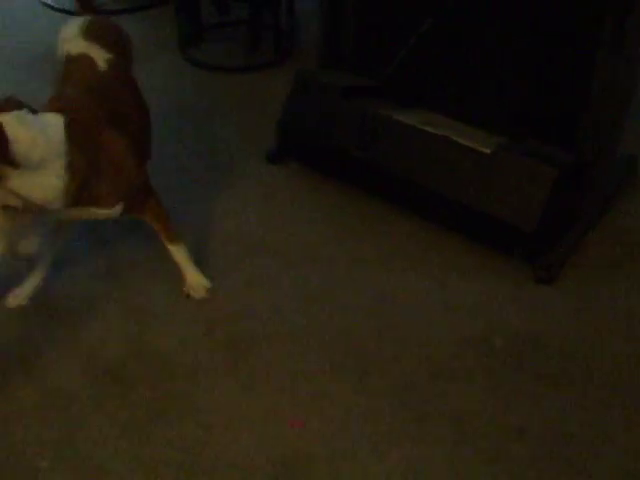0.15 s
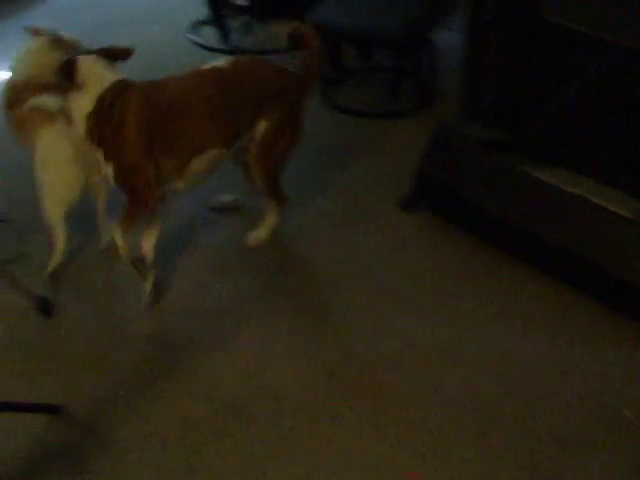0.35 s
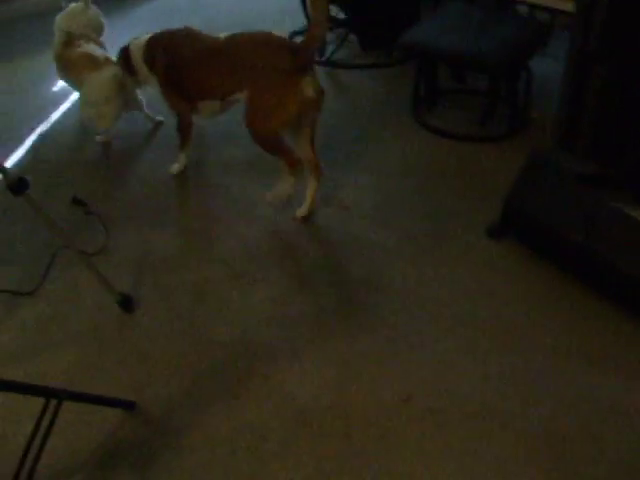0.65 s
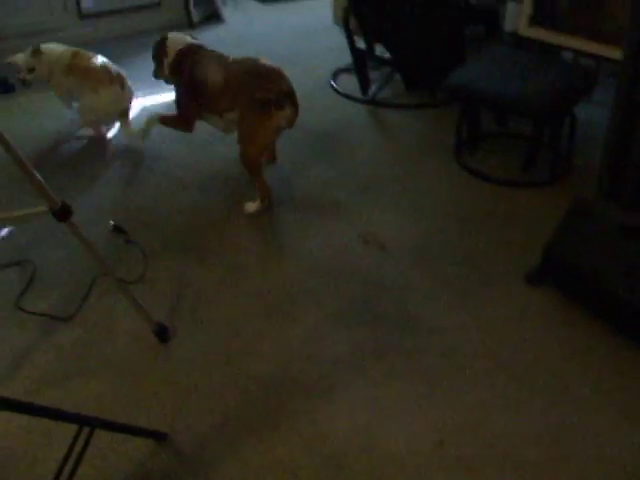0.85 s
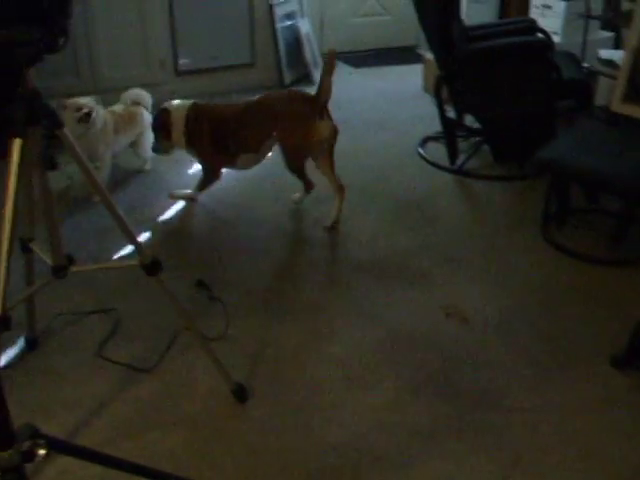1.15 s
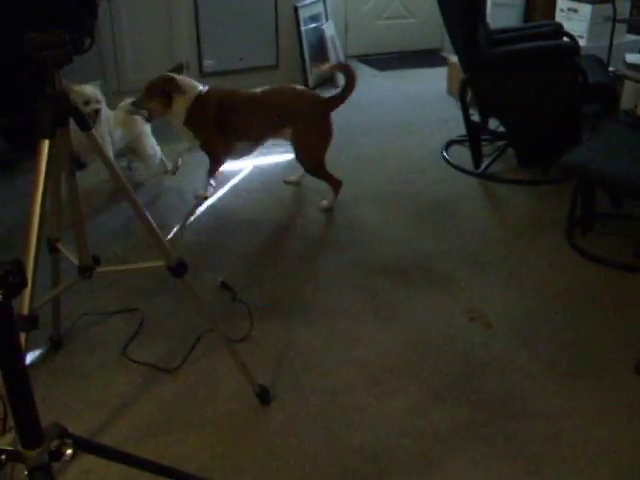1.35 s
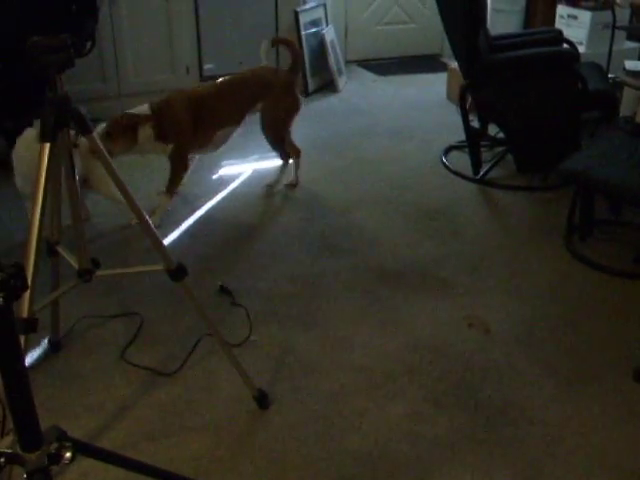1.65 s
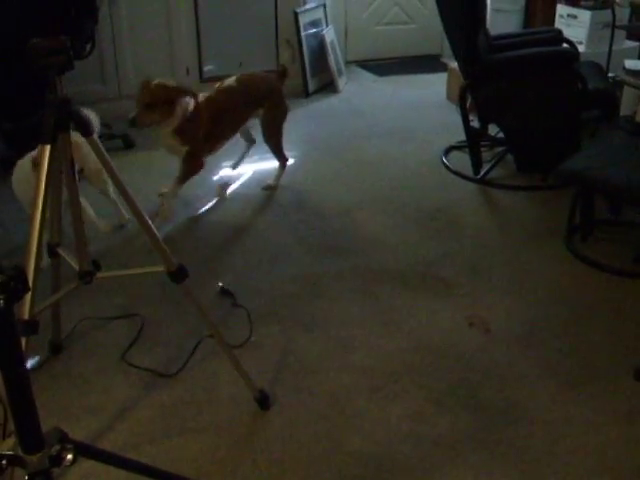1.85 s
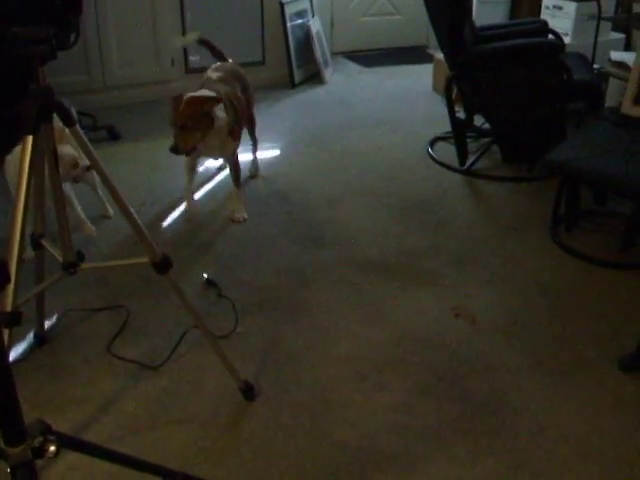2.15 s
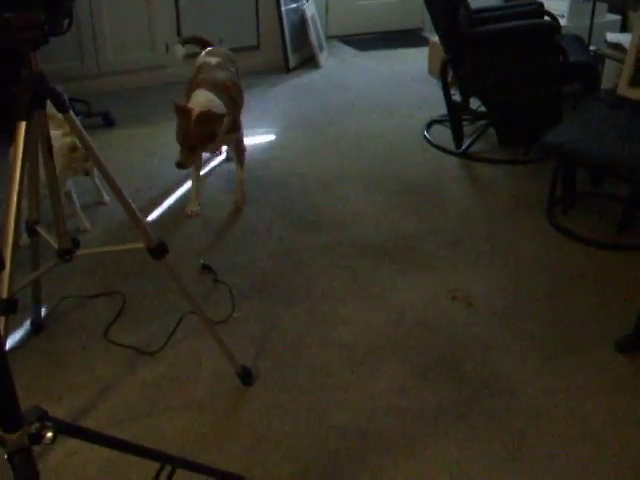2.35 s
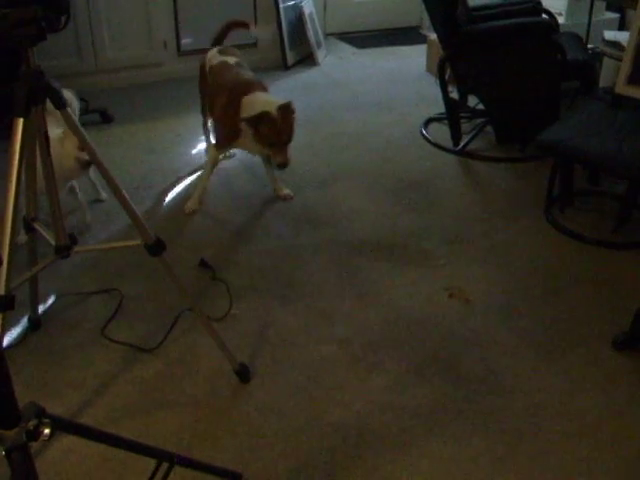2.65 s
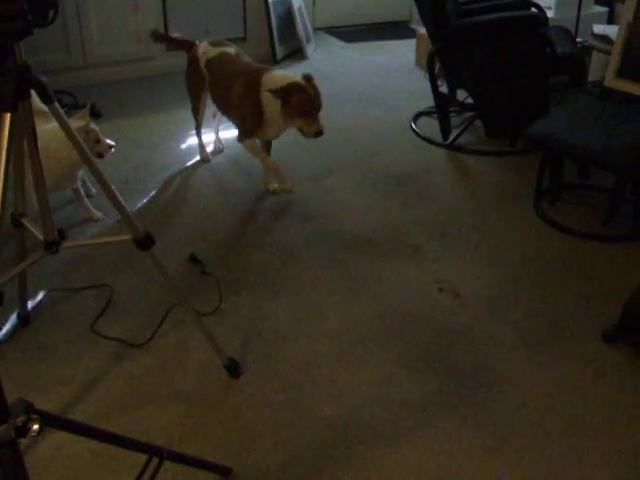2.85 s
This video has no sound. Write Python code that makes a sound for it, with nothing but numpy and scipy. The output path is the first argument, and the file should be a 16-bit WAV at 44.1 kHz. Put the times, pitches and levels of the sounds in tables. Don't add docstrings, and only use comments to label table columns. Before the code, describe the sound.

Playful dog growls and hoarse breaths over muffled paw thumps on carpet, a snort near one second, a sharp tooth snap later, a final short bark, all over faint camera hiss, hum and thin whine.

```python
import sys
import numpy as np
from scipy import signal
from scipy.fft import rfft, irfft
from scipy.io import wavfile
from scipy.ndimage import uniform_filter1d

SR = 44100
rng = np.random.default_rng(int(sys.argv[2]) if len(sys.argv) > 2 else 0)


def put_to_file(sound):
    columns = np.atleast_2d(sound).T
    safe = np.clip(columns, -1, 1)
    whole_steps = np.round(safe * 32767)
    wavfile.write(sys.argv[1], SR, whole_steps.astype(np.int16))


def boost_factor(decibels):
    exponent = np.asarray(decibels, float) / 20
    return 10 ** exponent


N = 132300
T = np.arange(N) / SR
LEAD_S = 0.15

# frequency_hz, density_db
HISS_SPECTRUM = [(15, -34), (25, -8.5), (49, -22), (106, -19.5), (453, -20), (511, -19.5), (635, -22),
                 (4700, -26), (8000, -25), (10400, -20.5), (17600, -120)]
# pitch_hz, level_db
HUM_TONES = [(60, -62.5), (294, -68)]
# start_s, level_db, floor_note_hz
PAW_LANDINGS = [(.0, -48, 226), (0.07, -39.5, 200), (0.157, -32, 232), (0.212, -34, 222), (0.299, -40, 196),
                (0.353, -47, 192), (0.479, -26.5, 275), (0.496, -34, 334), (0.514, -34, 311),
                (.535, -43, 390), (0.589, -35, 260), (.63, -38.5, 202), (0.698, -45, 201),
                (0.757, -27.5, 284), (0.899, -53, 241), (1.003, -30.5, 293), (1.101, -37.5, 270),
                (1.167, -41, 344), (1.19, -41.5, 324), (1.299, -31.5, 298), (1.32, -52, 372),
                (1.34, -44, 250), (1.501, -43.5, 340), (1.567, -34.5, 297), (1.616, -30.5, 230),
                (1.659, -32, 205), (1.832, -66, 303), (2.039, -46, 286)]
# pitch_hz, level_db, t60_s
BOARD_MODES = [(200, -7.5, 0.16), (409.3, -22.5, 0.45), (440, -3, 0.02), (790, -12, 0.047)]
# full_strength_s, swell_time_constant_s, hold_s, level_db, mouth_resonance_hz
HUFF_BURSTS = [(0.059, 0.025, 0.0067, -56.5, 1650), (.143, 0.0067, 0.066, -41, 1510),
               (0.201, 0.004, 0.014, -38, 1500), (0.234, 0.031, 0.011, -42, 1220),
               (0.587, 0.03, 0.032, -41.5, 1400), (0.766, 0.014, 0.02, -50, 1090),
               (0.952, 0.024, 0.064, -30, 1240), (1.175, 0.0017, 0.047, -48.5, 1210),
               (1.551, 0.01, 0.073, -47.5, 1540), (1.62, 0.0065, 0.05, -28.5, 1450),
               (1.682, .001, 0.033, -33.5, 1540), (1.721, .003, 0.021, -43.5, 1530),
               (2.042, 0.0026, 0.019, -53, 850), (2.224, 0.002, 0.011, -48, 1000),
               (2.678, 0.0065, 0.048, -21, 1380)]
# mouth_resonance_db, open_mouth_hiss_db, teeth_hiss_db, chest_rumble_db, fade_s
HUFF_COLOURS = [(3, -2, 0, 5, 0.01), (-10, -8.5, -21, -9, 0.0088), (-4.5, -6, -7, -10.5, 0.067),
                (1, -4.5, 5, -32, 0.024), (-2, 1, -7.5, -7.5, 0.021), (-5.5, -8, -7, 1.5, 0.066),
                (-8, -4.5, -0.5, -13.5, 0.027), (-7.5, -6.5, -7, -6, 0.041), (-0.5, -6.5, -3, -2.5, 0.016),
                (-7.5, -3, -9, -19, 0.04), (-6.5, -5.5, -24, -9, 0.0037), (-1, 0, -2.5, -13, 0.0081),
                (-6, -4, -12, -2, 0.006), (-10, -19, -25, -8.5, 0.018), (-5, -10, -7, -16, 0.023)]
# multiple_of_main_resonance [ratio], relative_width [ratio], level_db
MOUTH_MODES = [(1, 0.26, 6.5), (1.4, 0.19, -7.5), (2.05, 0.38, -1), (2.5, 0.44, -8.5)]
# full_strength_s, swell_time_constant_s, hold_s, level_db, throat_hz
GROWL_BREATHS = [
    (0.089, 0.031, 0.076, -53.5, 805),
    (0.256, 0.014, 0.0069, -40, 867),
    (0.664, 0.012, 0.0099, -49.5, 870),
    (0.929, 0.074, 0.071, -37.5, 650),
    (1.783, 0.03, 0.036, -38.5, 770),
]
WHISTLE_STARTS = [.065, .145, .558, .93, .95, .96, 1.543, 1.6, 1.61, 1.63, 1.683, 1.715, 1.8, 1.82, 2.49,
                  2.495, 2.582, 2.595, 2.635, 2.648, 2.663, 2.675, 2.685, .578, .59, .465, 2.77, .87]
# length_s, level_db, pitch_hz, breadth_hz
WHISTLE_TONES = [(.08, -49.5, 830, 100), (0.022, -42, 2100, 230), (0.029, -33, 1662, 32),
                 (0.068, -38, 1540, 163), (0.066, -38, 2890, 250), (0.055, -45, 940, 80),
                 (0.0091, -47, 4700, 600), (0.022, -49, 990, 170), (0.031, -32.5, 5380, 770),
                 (0.037, -38, 6000, 200), (0.035, -60, 600, 120), (0.036, -51, 1570, 100),
                 (.16, -44, 8600, 9700), (0.065, -46.5, 630, 130), (0.13, -56, 1960, 210),
                 (0.11, -56.5, 1120, 90), (0.092, -52.5, 1060, 130), (0.042, -64, 3400, 100),
                 (0.021, -47, 1380, 220), (0.096, -33.5, 6200, 3000), (0.046, -35.5, 3530, 220),
                 (0.067, -28.5, 1195, 290), (0.045, -31.5, 5650, 600), (0.053, -47, 3770, 370),
                 (0.067, -57, 5700, 680), (.09, -58, 2350, 150), (0.12, -55, 1800, 170),
                 (0.1, -44.5, 490, 360)]
# start_s, level_db, pitch_hz
JOIST_THUMPS = [
    (.1, -48, 121),
    (0.272, -47, 112),
    (.76, -48.5, 62),
    (0.961, -38.5, 110),
    (.98, -50, 54.3),
    (1.63, -36, 117),
    (1.679, -38.5, 71),
    (1.82, -51, 62),
    (2.691, -40.5, 60.6),
    (2.709, -40, 129.7),
]
# start_s, length_s, peak_db, pitch_hz
BREATH_SURGES = [(.134, 0.0088, -38.5, 807), (.157, 0.03, -43.5, 1504), (0.194, 0.0092, -34, 1540),
                 (.208, 0.0058, -39, 1290), (0.214, 0.0063, -39, 1400), (0.233, .012, -39, 1480),
                 (0.259, 0.017, -40.5, 876), (0.586, 0.019, -37.5, 2956), (0.484, .05, -54, 1487),
                 (0.488, 0.016, -52, 786), (0.954, 0.01, -26, 1640), (.959, 0.015, -26.5, 1226),
                 (.96, 0.01, -32.5, 4400), (0.966, 0.005, -29, 1804), (0.978, 0.0053, -34, 2820),
                 (0.983, 0.011, -25, 1780), (.999, 0.0066, -25, 2740), (1.013, 0.025, -30.5, 1300),
                 (1.178, 0.0076, -43, 1180), (1.197, 0.014, -46, 808), (1.555, 0.017, -42, 1617),
                 (1.574, 0.0099, -40.5, 1504), (1.625, 0.0091, -30, 1440), (1.644, 0.01, -27, 1570),
                 (1.653, .011, -27, 3000), (1.683, 0.0066, -24.5, 1538), (1.694, 0.013, -31, 1454),
                 (1.68, 0.045, -32.5, 3050), (1.705, 0.006, -20, 1496), (1.723, 0.022, -32.5, 1576),
                 (2.582, 0.022, -46.5, 1075), (2.588, 0.056, -50, 2110), (2.677, 0.015, -26, 2030),
                 (2.683, .017, -19, 1366), (2.69, 0.004, -25, 4300), (2.703, 0.011, -16, 1387),
                 (2.7, .009, -23.5, 2670), (2.716, 0.019, -24, 1392), (2.719, 0.0041, -29, 2680),
                 (2.76, 0.012, -30.5, 1560)]
# start_s, level_db, ring_hz
TEETH_SNAPS = [
    (.15, -31, 2150),
    (1.002, -33, 1255),
    (1.178, -44, 887),
    (1.681, -17.5, 1518),
]
# pitch_hz, level_db, t60_s
SNORT_MODES = [(370, -2, .02), (620, 0, .022), (1270, -2, .025), (2780, -5, .02), (4600, -6, .015)]


def level(x, db):
    return x * boost_factor(db) / np.sqrt(np.mean(x ** 2))


def band(x, hz, width):
    return signal.lfilter(*signal.iirpeak(hz, hz / width, fs=SR), x)


def walk(rate, count):
    k = int(SR / rate)
    held = np.repeat(rng.standard_normal(count // k + 2), k)
    return 1.2 * uniform_filter1d(held, k)[:count]


def shape(swell, hold, fade, count):
    t = T[:count] - LEAD_S
    rise = np.minimum(t, 0) / max(swell, 3e-4)
    fall = np.maximum(t - hold, 0) / max(fade, 1e-3)
    return np.exp(rise - fall)


def ring(t, hz, t60):
    return np.sin(2 * np.pi * hz * t) * boost_factor(-60 * t / t60)


def add(out, s, x):
    i = int(s * SR)
    x = x[max(-i, 0):N - i]
    out[max(i, 0):max(i, 0) + len(x)] += x


def sine(hz, db):
    return boost_factor(db + 1) * np.sin(2 * np.pi * (hz * T + rng.random()))


def camera_hiss():
    f = np.maximum(np.arange(N // 2 + 1) * SR / N, 1)
    hz, db = np.array(HISS_SPECTRUM).T
    colour = boost_factor(np.interp(np.log(f), np.log(hz), db))
    return level(irfft(rfft(rng.standard_normal(N)) * colour, N), -51)


def mains_hum():
    return sum(sine(hz, db + 0.87 * walk(5.1, count=N)) for hz, db in HUM_TONES)


def camera_whine():
    whine_hz, fold_hz, frame_hz = 7867, 16000, 30
    whine_db, fold_db = -59, -4
    flip_sharp, flip_lag_s = 15, 0.0195
    flip = np.tanh(flip_sharp * np.sin(np.pi * frame_hz * (T - flip_lag_s)))
    return flip * (sine(whine_hz, whine_db) + sine(fold_hz - whine_hz, whine_db + fold_db))


def paws():
    note_t60_s, push_s, carpet_low_hz = 0.079, 0.0013, 175
    out, t = np.zeros(N), T[:SR // 3]
    chance = rng.standard_normal((len(PAW_LANDINGS), len(BOARD_MODES)))
    for (s, db, hz), luck in zip(PAW_LANDINGS, chance):
        thud = ring(t, hz, note_t60_s)
        for (f, g, t60), e in zip(BOARD_MODES, luck):
            thud = thud + boost_factor(g + 5.7 * e) * ring(t, f * (1 + 0.043 * e), t60)
        add(out, s, boost_factor(db) * thud * (1 - np.exp(-t / push_s)) ** 2)
    return signal.lfilter(*signal.butter(3, carpet_low_hz, "high", fs=SR), out)


def huffs():
    flutter_hz, flutter_db = 170, 3
    notch_hz, notch_width_hz, notch_depth = 3900, 900, 0.6
    out, n = np.zeros(N), SR // 2
    for burst, colour in zip(HUFF_BURSTS, HUFF_COLOURS):
        s, swell, hold, db, hz = burst
        ring_db, wide_db, teeth_db, chest_db, fade = colour
        flutter = boost_factor([flutter_db * walk(flutter_hz, count=n) for _ in range(3)])
        mouth_air, low_air, open_air = rng.standard_normal((3, n)) * flutter
        mouth = np.zeros(n)
        for k, (multiple, width, g) in enumerate(MOUTH_MODES):
            mouth += (-1) ** k * boost_factor(g) * band(mouth_air, hz * multiple, hz * multiple * width)
        wide = band(band(open_air, 2870, 1700), 2500, 3000)
        wide = wide + boost_factor(9) * band(band(open_air, 1780, 640), 2520, 1400)
        teeth = band(low_air, 3900, 2700) + boost_factor(-5) * band(low_air, 7800, 2400)
        teeth = band(teeth, 6020, 4400)
        chest = band(band(low_air, 301, 630), 348, 960)
        x = level(mouth, ring_db) + level(wide, wide_db) + level(teeth, teeth_db) + level(chest, chest_db)
        x = x - notch_depth * band(x, notch_hz, notch_width_hz)
        add(out, s - LEAD_S, boost_factor(db) * x * shape(swell, hold, fade, count=n))
    return out


def growls():
    pulse_hz, jitter, breath_db = 55, 0.2, 0
    fade_s, sag = 0.039, 0.975
    out, n = np.zeros(N), SR // 2
    for s, swell, hold, db, hz in GROWL_BREATHS:
        phase = np.cumsum(pulse_hz * (1 + jitter * walk(40, count=n))) / SR % 1
        air = rng.standard_normal(n) * (np.exp(-phase / 0.32) + boost_factor(breath_db))

        def throat(f):
            return band(band(air, f, 290), f, 660) + boost_factor(-6.5) * band(air, f * 2, 520)

        closing = np.clip((T[:n] - LEAD_S) / (hold + fade_s), 0, 1)
        x = (1 - closing) * throat(hz) + closing * throat(hz * sag)
        x = x + boost_factor(3.5) * band(air, 309, 150) + boost_factor(-7) * band(air, 584, 170)
        x = x + boost_factor(-22) * band(air, 3280, 590) + boost_factor(-14) * band(air, 3600, 4100)
        add(out, s - LEAD_S, level(x, db) * shape(swell, hold, fade_s, count=n))
    return out


def whistles():
    out, n = np.zeros(N), SR // 5
    for s, (length, db, hz, width) in zip(WHISTLE_STARTS, WHISTLE_TONES):
        noise = band(band(rng.standard_normal(2 * n), hz, width), hz, 2 * width)[n:]
        power = uniform_filter1d(noise ** 2, size=400) + 0.19 * np.mean(noise ** 2)
        arch = np.sin(np.pi * np.clip(T[:n] / length, 0, 1)) ** 0.6
        add(out, s, boost_factor(db) * noise / np.sqrt(power) * arch)
    return out


def thumps():
    t60_s, push_s = 0.2, 0.027
    out, t = np.zeros(N), T[:SR // 3]
    for s, db, hz in JOIST_THUMPS:
        add(out, s, boost_factor(db + 5) * ring(t, hz, t60_s) * (1 - np.exp(-t / push_s)))
    return out


def surges():
    waver = 0.02
    out, t = np.zeros(N), T[:SR // 10]
    for s, length, db, hz in BREATH_SURGES:
        phase = np.cumsum(hz * (1 + waver * walk(140, count=len(t)))) / SR + rng.random()
        arch = np.sin(np.pi * np.clip(t / length, 0, 1))
        add(out, s, boost_factor(db) * np.sin(2 * np.pi * phase) * arch)
    return out


def snaps():
    ring_t60_s, crack_db, crack_fade_s = 0.044, 1, 0.00035
    out, t = np.zeros(N), T[:SR // 20]
    for s, db, hz in TEETH_SNAPS:
        noise = band(band(rng.standard_normal(len(t)), 3600, 3000), 3500, 3500)
        crack = level(noise, crack_db) * np.exp(-t / crack_fade_s)
        add(out, s, boost_factor(db) * (crack + ring(t, hz, ring_t60_s)))
    return out


def rattle():
    start_s, slap_hz, slap_count = 0.9025, 49.9, 6
    peak_s, peak_db, swell_db_per_s = 1.003, -21.5, 120
    out, t = np.zeros(N), T[:SR // 20]
    for s in start_s + np.arange(slap_count) / slap_hz:
        slap = sum(boost_factor(g + 2 * rng.standard_normal()) * ring(t, f, t60) for f, g, t60 in SNORT_MODES)
        add(out, s, -slap / 2 * boost_factor(peak_db - swell_db_per_s * abs(s - peak_s)))
    return out


def room(x):
    t60_s, treble_t60_s, gap_s = 0.3, 0.18, 0.0047
    t = T[:SR // 2]
    noise = rng.standard_normal(len(t)) * (1 - np.exp(-(t / gap_s) ** 2))
    low = signal.lfilter(*signal.butter(1, 2000, fs=SR), noise)
    tail = low * boost_factor(-60 * t / t60_s) + (noise - low) * boost_factor(-60 * t / treble_t60_s)
    return signal.fftconvolve(x, tail / np.sqrt(np.sum(tail ** 2)))[:N]


def scene():
    top_hz, mic_low_hz = 8000, 42
    noise = camera_hiss() + mains_hum()
    thuds = paws() + thumps()
    voices = huffs() + growls() + snaps() + rattle()
    tones = whistles() + surges()
    wet = room(boost_factor(-7) * voices + boost_factor(-14) * tones + boost_factor(-11) * thuds)
    mix = voices + tones + thuds + wet + noise
    soft = signal.sosfiltfilt(signal.butter(12, top_hz, fs=SR, output="sos"), mix)
    heard = signal.lfilter(*signal.butter(2, mic_low_hz, "high", fs=SR), soft)
    return (heard + camera_whine())[None]


def band_limit(x):
    return signal.sosfilt(signal.butter(12, 9290, fs=SR, output="sos"), x)


def record(dry):
    cut_hz, offset = 8870, -0.0024
    steep = signal.ellip(10, 0.2, 60, cut_hz, fs=SR, output="sos")
    mix = signal.sosfilt(steep, dry) + offset
    return band_limit(mix)


dry = scene()
out = record(dry)
put_to_file(out)
```